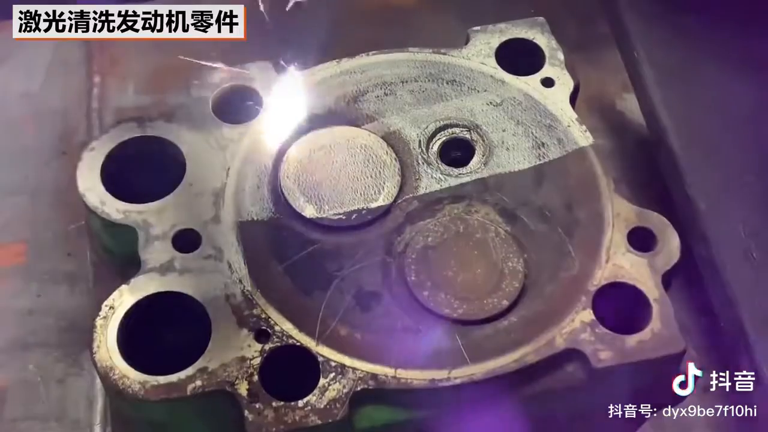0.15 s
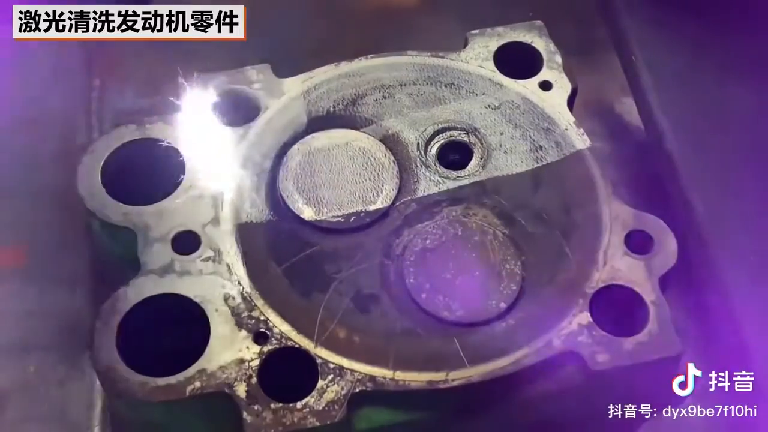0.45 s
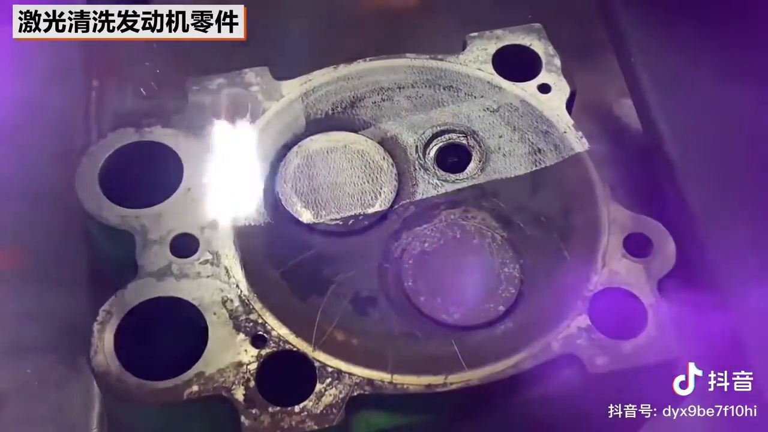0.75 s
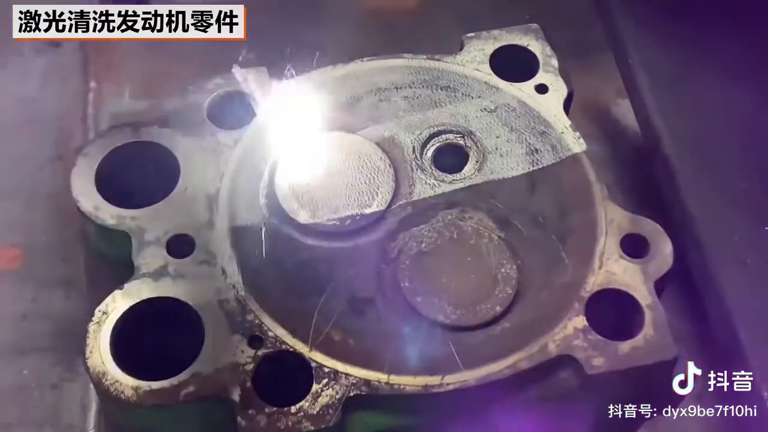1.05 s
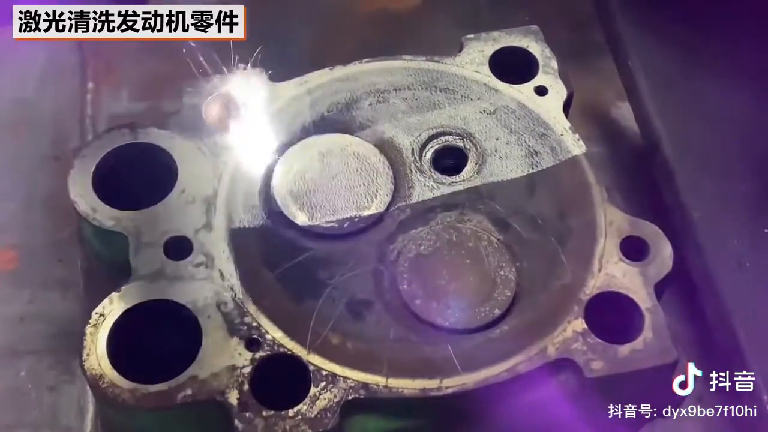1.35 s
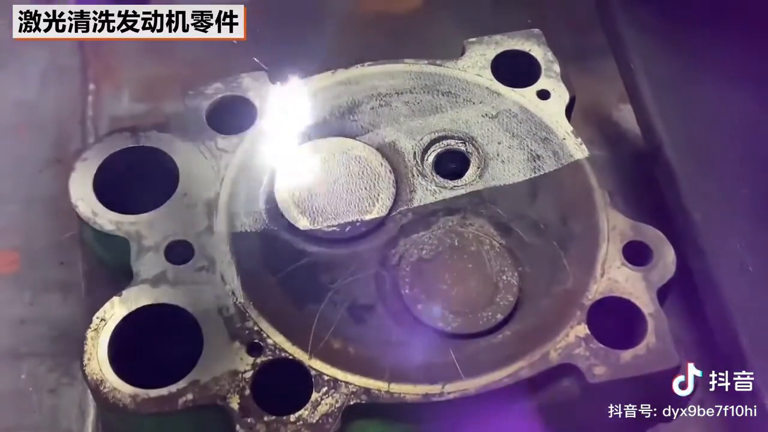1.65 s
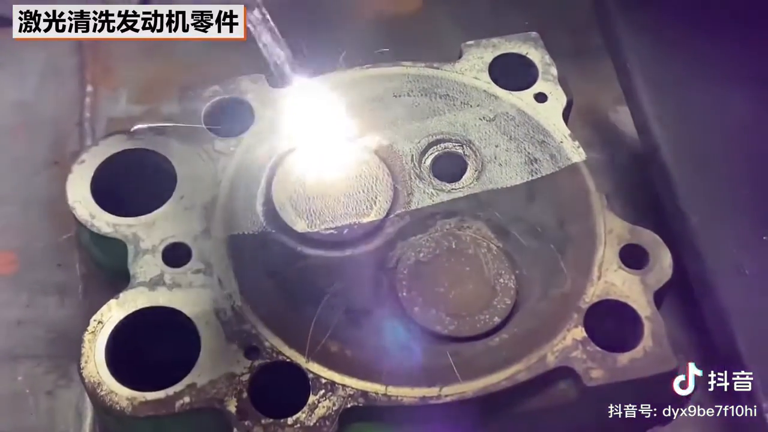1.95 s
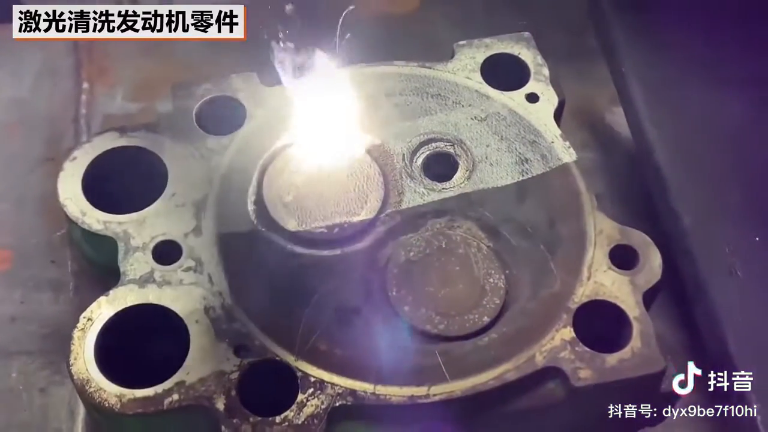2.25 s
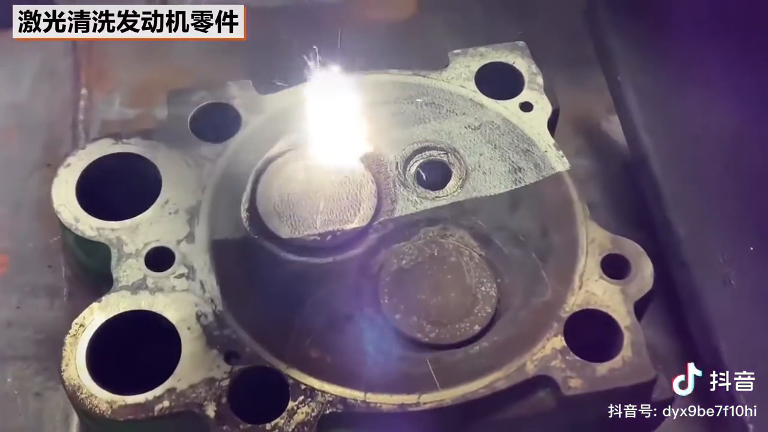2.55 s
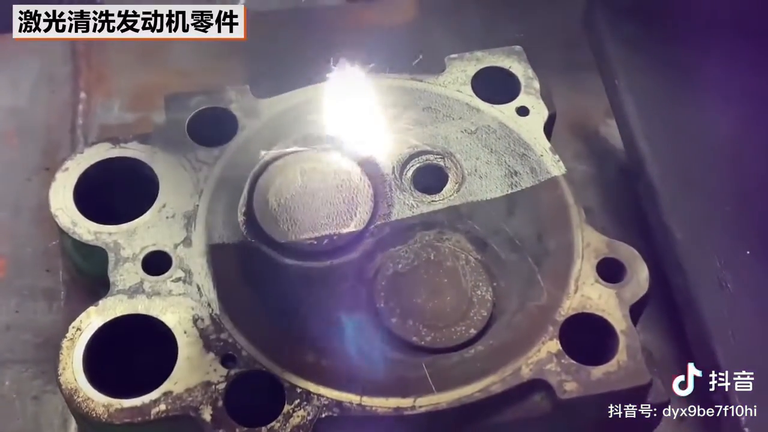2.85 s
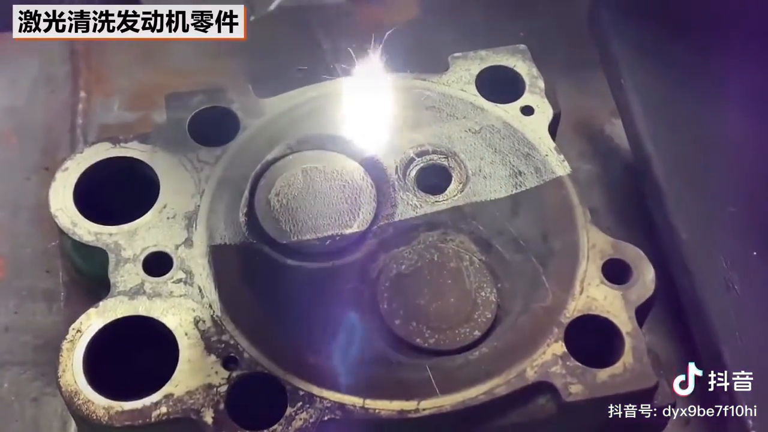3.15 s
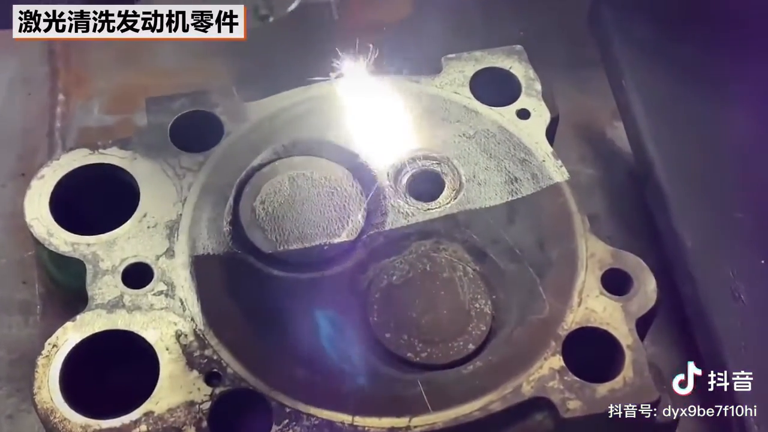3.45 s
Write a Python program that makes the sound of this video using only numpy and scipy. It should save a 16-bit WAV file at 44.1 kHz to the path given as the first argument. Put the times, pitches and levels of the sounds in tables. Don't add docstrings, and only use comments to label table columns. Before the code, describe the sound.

A laser cleaning a metal engine part rasps and hisses close to a stereo phone microphone. A rough crackling flare at 0.1 s drops to thin airy fizz until 0.75 s, then a loud buzz swells to 1.2 s. It dips, roughens around 1.5 s, and flares again with whining tones from 1.7 to 2.3 s, then eases into a smoother hiss. Tiny sparks snap; workshop fans and chiller hum faintly throughout.

```python
import sys
import numpy as np
from scipy import signal
from scipy.fft import rfft, irfft
from scipy.io import wavfile
from scipy.ndimage import uniform_filter1d, map_coordinates

SR = 44100
rng = np.random.default_rng(int(sys.argv[2]) if len(sys.argv) > 2 else 0)


def amplitude_ratio(level_db):
    exponent = np.asarray(level_db, float) / 20
    return 10 ** exponent


def output_pcm(signal):
    pcm = np.clip(np.atleast_2d(signal).T, -1, 1) * 32767
    wavfile.write(sys.argv[1], SR, np.round(pcm).astype(np.int16))


N = 159642


def evened(x):
    return x / np.sqrt(np.mean(abs(x) ** 2) + 1e-20)


def read(points, hz):
    f, value = np.transpose(points)
    return np.interp(np.log(hz + 1), np.log(f + 1), value)


def colour(x, points):
    gain = amplitude_ratio(read(points, np.fft.rfftfreq(len(x), 1 / SR)))
    return evened(irfft(rfft(x) * gain, len(x)))


def wander(seconds):
    knots = np.convolve(rng.standard_normal(400), np.hanning(7), "same")
    return evened(np.interp(np.arange(N) / SR / seconds * 4, np.arange(400), knots))


def fade_between(t, start, end, half):
    return np.interp(t, [start - half, start + half, end - half, end + half], [0, 1, 1, 0])


# pitch in Hz, level in dB rms, pitch waver in Hz.
CHILLER_HUM = [(118.3, -51, 0.56), (617.5, -44, 0.94), (1221, -67, 3.46)]
# pitch in Hz, width in Hz, level in dB rms.
FANS = [(283.2, 5.2, -57.5), (336.5, 6.6, -51.5), (491.3, 16.6, -47.5), (2038, 99, -41.5), (680, 30, -48.5)]
# frequency in Hz, density in dB per Hz.
SHOP_WASH = [(40, -50), (55, -36), (100, -5), (160, 2), (650, -21.5), (780, 0), (1000, -1), (1300, -3.5),
             (3000, -11.5)]
# time in seconds, background level in dB.
SHOP_LEVEL = [
    (0, 0),
    (2, 1),
    (2.5, -1.5),
    (3.62, -1),
]


def shop():
    t = np.arange(N) / SR
    out = amplitude_ratio(-42.5) * colour(rng.standard_normal(N), SHOP_WASH)
    for hz, db, waver_hz in CHILLER_HUM:
        phase = 2 * np.pi * np.cumsum(hz + waver_hz * wander(0.17)) / SR
        out += amplitude_ratio(db + 0.38 * wander(.15)) * np.sqrt(2) * np.sin(phase)
    for hz, width_hz, db in FANS:
        noise = rng.standard_normal(N) + 1j * rng.standard_normal(N)
        blur = 0.85 * evened(signal.lfilter([1], [1, -np.exp(-np.pi * width_hz / SR)], noise))
        out += amplitude_ratio(db) * np.sqrt(2) * (blur * np.exp(2j * np.pi * hz * t)).real
    return out * amplitude_ratio(np.interp(t, *np.transpose(SHOP_LEVEL)))


def room_return(x):
    t60_s = 0.089
    t = np.arange(round(.3 * SR)) / SR
    taps = rng.standard_normal(len(t)) * amplitude_ratio(-60 * t / t60_s) * (t > .002)
    return signal.fftconvolve(x, taps / np.linalg.norm(taps))[:N]


# time in seconds, level in dB.
SPARKS = [(0.04, -14), (0.087, -17), (.152, -7.5), (0.603, -10), (0.999, -17), (1.458, -29), (1.473, -19),
          (1.522, -15), (2.764, -14), (2.782, -27), (2.828, -21), (2.848, -12), (3.05, -13), (3.053, -29)]


def sparks():
    decay_s = .0006
    out = np.zeros(N)
    puff = np.exp(-np.arange(300) / (decay_s * SR))
    for start, db in SPARKS:
        out[round(start * SR):][:300] += amplitude_ratio(db) * puff * np.diff(rng.standard_normal(301))
    return out


DRIFT_S = .12


def spot_path():
    since_peak = np.arange(N) / SR - .088
    return 279.95 * since_peak, 62.1 * since_peak


def soot(fast, slow, fall):
    k, m = np.fft.fftfreq(256, 1 / 256)[:, None], np.fft.fftfreq(16, 1 / 16)
    smoothness = amplitude_ratio(-fall[0] * abs(k) - fall[1] * abs(m)) * (abs(k) < 40)
    maps = np.fft.ifft2(np.fft.fft2(rng.standard_normal((80, 256, 16))) * smoothness).real
    path = [np.arange(N) / SR / DRIFT_S + 1, fast % 1 * 256, slow % 1 * 16]
    return evened(map_coordinates(maps, path, order=1, mode="grid-wrap"))


# multiple of the
# fast swing, multiple of the slow swing, level in dB, start in seconds, end in seconds.
EDGES = [(1, 0, -50, 1.62, 2.3), (3, 0, -41.5, 1.86, 2.2), (4, 0, -35, 1.71, 2.255),
         (4, 1, -41, 1.62, 2.03), (5, -1, -48, 1.9, 2.34), (6.18, -1, -45, 1.53, 2.66),
         (6, 0, -35, 1.78, 2.1), (6.86, 0, -26.5, 1.905, 2.11), (6.76, 1, -57, 1.4, 1.3),
         (8.35, 0, -43, 1.66, 2.47), (10, 1, -39.5, 2, 2.45), (10.73, 0, -27, 4.3, 4.3),
         (4, 0, -36, 0.88, 1.16), (3.94, 1, -38, 1.06, 1.06), (4.97, -1, -53, 1.4, 1.1),
         (4.93, 1, -52, 1.1, 1.2), (10, 0, -56.5, 0.89, 3.3), (11, 0, -45, 2.4, 3.7),
         (13, 0, -45, 2.64, 3.4), (14, 0, -42.5, 1.76, 3.62), (16.68, 0, -64, 2.3, 3.49),
         (25.8, 0, -50, 2.5, 4), (14.58, 0, -66, 1.65, 1.6), (2, 0, -49, 1.8, 2)]


def edge_tones(fast, slow):
    t = np.arange(N) / SR
    out = np.zeros(N)
    for k, m, db, start, end in EDGES:
        level = amplitude_ratio(db) * (1 + .2 * wander(DRIFT_S)) * fade_between(t, start, end, 0.063)
        out += level * np.cos(2 * np.pi * (round(k) * fast + round(m) * slow + rng.random()))
    return out


def plasma_gate(fast, slow, patchy):
    slow_depth, fast_depth, cross_depth, random_depth = 0.81, 0.22, .2, 0.25
    thickest = 1.3
    slow_swing = np.cos(2 * np.pi * slow)
    bump = np.exp(7.0 * np.cos(2 * np.pi * fast))
    bump = evened(bump - bump.mean())
    thick = slow_depth * patchy ** 2 * slow_swing
    thick += fast_depth * (1 + 2 * patchy ** 2) * bump
    thick += cross_depth * bump * slow_swing
    thick += random_depth * soot(fast, slow, (2.5, 2.5))
    gate = np.exp(thickest * np.tanh(thick / thickest))
    return gate / np.sqrt(uniform_filter1d(gate ** 2, 2840))


def soot_snaps(gate, patchy):
    per_s, spread_db = 300, 4.5
    struck = rng.random(N) < gate * per_s / SR
    size = amplitude_ratio(spread_db * np.minimum(rng.exponential(1, N), 2.5))
    sign = np.where(rng.random(N) < .75, 1., -1.)
    return evened(struck * size * sign) * np.clip(patchy, .05, 1.2) ** 0.73


# time in seconds, burn level in dB,
# fizz share in dB, patchiness of the soot, buzz level in dB.
BURN = [(0, -35.5, -2.5, 1.1, -1), (.1, -31, -5, 3.2, -16), (.17, -37, -2, 1.1, -7),
        (.28, -43.5, 4.5, 0.25, 2), (.56, -43.5, 0.5, 0.42, 2), (.61, -41.5, 3.5, 1.1, -2),
        (.74, -41.5, 4.5, 0.23, 3), (.8, -30, -3, 0.2, -14), (1.09, -29.5, -1.5, 0.61, 3.5),
        (1.36, -40.5, 0, 0.36, 0), (1.5, -38, 0.5, 2.4, -30), (1.68, -31.5, -1.5, 0.98, 6.5),
        (1.91, -30, -2.5, 0.23, -1), (2.07, -32, 1.5, 0.59, -29), (2.3, -32.5, -1.5, 0.75, -8),
        (2.6, -37.5, 0, 0.26, -22), (3.36, -40, 1.5, 0.17, -3.5), (3.62, -41.5, 3, 0.23, -4)]
# frequency in Hz, density in dB per Hz.
HISS = [(60, -61), (300, 1), (450, -13), (950, -5), (1200, -2), (4500, 1.5), (8000, -5.5), (16000, -13)]
# frequency in Hz, density in dB per Hz.
FIZZ = [(3000, -32), (7000, -5.5), (10500, -4), (11800, -2), (13500, -3), (16000, -5.5)]
# frequency in Hz, gain in dB.
BUZZ = [(250, -20), (560, -22), (900, 17), (1200, 13.5), (2000, 20.5), (3500, 1), (5000, -38), (8000, -0.5)]


def laser():
    t = np.arange(N) / SR
    times, *columns = np.transpose(BURN)
    level_db, fizz_db, patchy, buzz_db = (np.interp(t, times, column) for column in columns)
    fast, slow = spot_path()
    gate = plasma_gate(fast, slow, patchy)
    snaps = soot_snaps(gate, patchy)
    hiss = gate * rng.standard_normal(N) + amplitude_ratio(-7) * snaps
    fizz = gate ** .5 * rng.standard_normal(N) + amplitude_ratio(-13) * snaps
    burn = amplitude_ratio(4.5) * colour(hiss, HISS)
    burn += amplitude_ratio(7.5 + fizz_db) * colour(fizz, FIZZ)
    burn += amplitude_ratio(buzz_db - 5.5) * colour(soot(fast, slow, (0, 3)), BUZZ)
    flutter = amplitude_ratio(.6 * wander(.05))
    return amplitude_ratio(-0.5) * edge_tones(fast, slow) + amplitude_ratio(level_db) * flutter * burn + sparks()


# frequency in Hz, lead in radians.
LEAD_LOW = [(500, .5), (780, -.4), (1030, -.5), (1400, .2), (1900, 1.4), (2300, .9), (2620, 2.8), (2850, 5),
            (3100, 6.2), (3500, 9.3), (3730, 9.5), (3900, 11), (4130, 10.3), (4320, 9.5), (4520, 9.45)]
# frequency in Hz, lead in radians.
LEAD_EARLY = [(5150, 9.7), (5420, 12), (5700, 9.2), (6400, 7.8), (7200, 7), (7750, 8.5), (8200, 6.8),
              (9000, 9.4), (11200, 9.3), (12000, 8.2), (14600, 6.3)]
# frequency in Hz, lead in radians.
LEAD_CASTING = [(4900, 10.8), (5170, 9.8), (5430, 12.2), (5700, 8.3), (5950, 9.45), (6500, 8), (7400, 7),
                (8300, 6.8), (9000, 9.4), (10900, 9.4), (11400, 8), (14600, 6.3)]
# frequency in Hz, lead in radians.
LEAD_DECK = [(4900, 10.4), (5250, 9.45), (6900, 9.45), (7300, 10.6), (8300, 11.5), (8800, 9.5), (9500, 8.2),
             (10300, 9.1), (11400, 9.2), (12000, 8.2), (14600, 6.3)]
# frequency in Hz, likeness from 0 to 1.
ALIKE_LOW = [(100, .99), (400, .85), (620, .9), (850, .55), (1300, .7), (2000, .5), (2450, .3), (2650, .6),
             (2900, .5), (3300, .5)]
# frequency in Hz, likeness from 0 to 1.
ALIKE_EARLY = [(3450, .8), (3700, .75), (3900, .5), (4150, .75), (5150, .72), (5900, .3), (8700, .35),
               (9300, .9), (11100, .88), (11800, .4), (13500, .5), (15000, .97)]
# frequency in Hz, likeness from 0 to 1.
ALIKE_CASTING = [(3650, .72), (4000, .6), (4400, .72), (4900, .45), (5400, .6), (5700, .45), (5950, .85),
                 (6250, .3), (8700, .45), (9050, .91), (10900, .87), (11300, .5), (13500, .45),
                 (15000, .97)]
# frequency in Hz, likeness from 0 to 1.
ALIKE_DECK = [(3540, .96), (3720, .96), (4000, .4), (4320, .97), (4510, .97), (4800, .45), (5350, .88),
              (6800, .83), (7300, .35), (8700, .6), (9500, .35), (11000, .7), (13500, .45), (15000, .97)]
# frequency in Hz, time in seconds.
DECK_TURN = [(3600, 1.6), (4400, 1.75), (5200, 1.95), (5600, 2.15), (5950, 1.75), (6300, 2.15), (6800, 2.2),
             (7200, 1.8), (9000, 1.9), (10000, 2.1), (12000, 2)]
# frequency in Hz, left minus right in dB.
BALANCE = [(100, -.8), (300, -2), (620, -5.5), (1000, -2), (2300, -2), (3100, -5), (3450, -.7),
           (14000, -.7)]
# frequency in Hz, gain in dB.
DECK = [(4400, -1), (4800, 6), (5500, -2), (6500, 5.5), (7000, -1.5), (8400, 0.5), (8900, -3), (9400, 0.5)]
# frequency in Hz, gain in dB.
HOLLOWS = [(700, -0.5), (770, -9), (850, 1.5), (980, -16), (1090, 2), (2500, -1.5), (2680, 0), (2850, 0.5)]


def ports(x):
    hz, t, (direct, diffuse) = signal.stft([x, room_return(x)], SR, nperseg=512, noverlap=384)
    deck = np.clip((t - read(DECK_TURN, hz)[:, None]) / .3 + .5, 0, 1)
    early = fade_between(t, .17, .76, .03)
    stages = (early, (1 - early) * (1 - deck), deck)
    turn, alike = 0, 0
    for share, lead, like in zip(stages, (LEAD_EARLY, LEAD_CASTING, LEAD_DECK),
                                 (ALIKE_EARLY, ALIKE_CASTING, ALIKE_DECK)):
        turn = turn + share * np.exp(1j * read(LEAD_LOW + lead, hz))[:, None]
        alike = alike + share * read(ALIKE_LOW + like, hz)[:, None]
    alike = np.clip(alike, 0, 1)

    def shifting(bins, frames):
        noise = uniform_filter1d(rng.standard_normal(direct.shape), size=bins, axis=0)
        return evened(uniform_filter1d(noise, size=frames, axis=1))

    patches, sway, drift = shifting(3, 60), shifting(4, 50), shifting(2, 40)
    turn = turn * np.exp(1j * 1.1 * (1 - alike) * sway)
    upper = (hz > 700)[:, None]
    gain = amplitude_ratio(read(DECK, hz)[:, None] * deck + read(HOLLOWS, hz)[:, None] + 1.7 * patches * upper)
    direct, diffuse = direct * gain, diffuse * gain
    right = alike * direct * turn / (abs(turn) + 1e-6)
    right = right + np.sqrt(1 - alike ** 2) * diffuse * np.exp(1j * drift * upper)
    tilt = amplitude_ratio(read(BALANCE, hz) / 2)[:, None]
    return signal.istft([direct * tilt, right / tilt], SR, nperseg=512, noverlap=384)[1][:, :N]


def scene():
    room_db = -20.5
    beam = laser()
    in_room = (beam + amplitude_ratio(room_db) * room_return(beam)) / np.sqrt(1 + amplitude_ratio(2 * room_db))
    return ports(in_room + shop())


def roll_off(x):
    return signal.sosfilt(signal.butter(12, 16740, fs=SR, output="sos"), x)


def record(dry):
    clip = .65
    steady = signal.lfilter(*signal.butter(2, 60, "high", fs=SR), dry)
    overloaded = clip * np.tanh(steady / clip)
    band_limit = signal.firwin(511, 15420, window=("kaiser", 9), fs=SR)
    return roll_off(signal.oaconvolve(overloaded, band_limit[None], "same"))


dry = scene()
out = record(dry)
output_pcm(out)
```